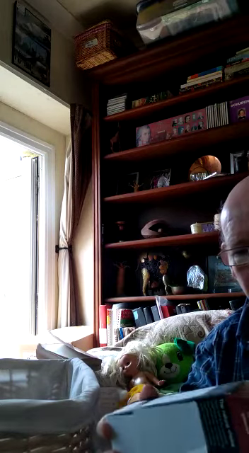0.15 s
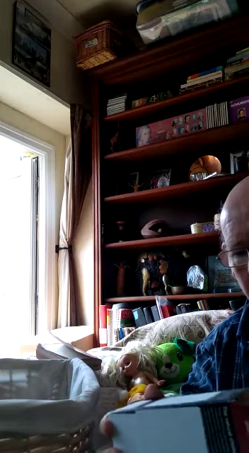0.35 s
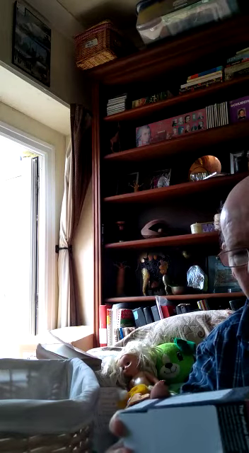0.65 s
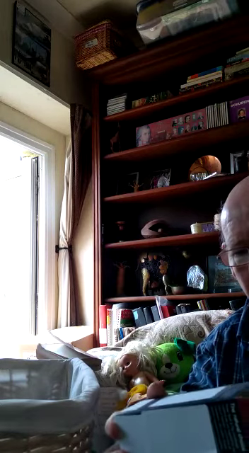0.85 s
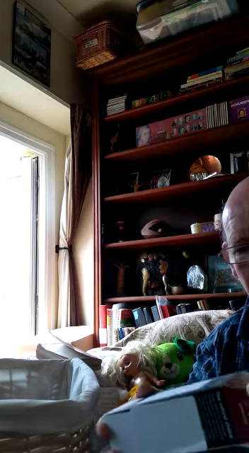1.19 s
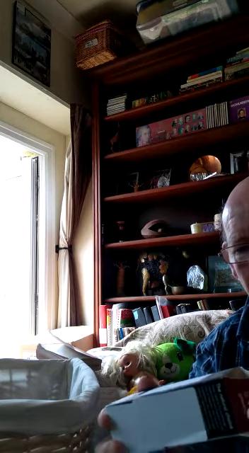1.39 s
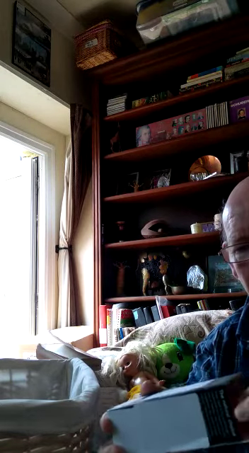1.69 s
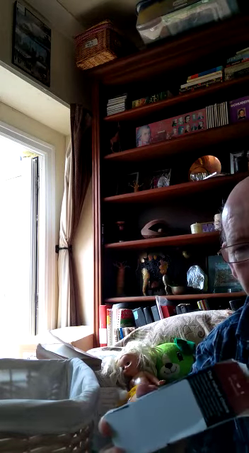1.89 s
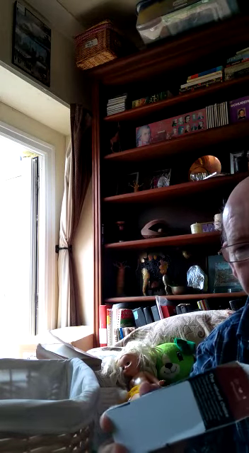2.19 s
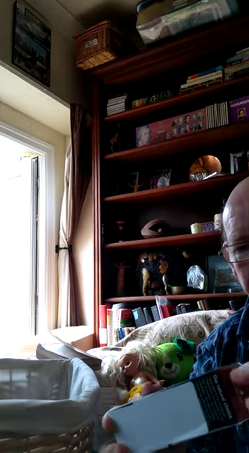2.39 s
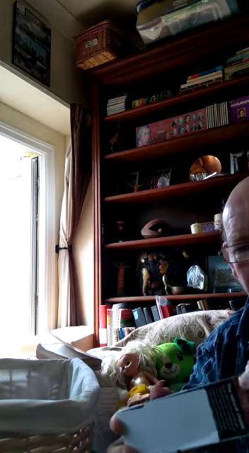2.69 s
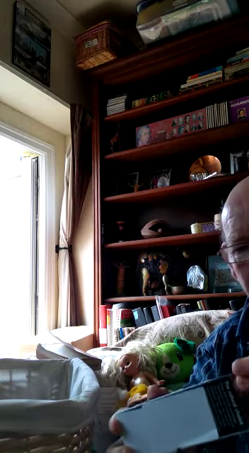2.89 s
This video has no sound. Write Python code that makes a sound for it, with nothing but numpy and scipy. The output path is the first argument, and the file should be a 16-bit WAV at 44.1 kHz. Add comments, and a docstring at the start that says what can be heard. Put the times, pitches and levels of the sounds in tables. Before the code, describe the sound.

Fingers slide and tap on a light hollow cardboard box, with a sharp rattling cluster near the end

```python
"""A quiet, furnished room: hands turn a small cardboard box close to a two-port microphone.
Fingers slide over the card (swelling fibre noise) and tap its panels (damped tones, thuds, cracks).
Near the end a flap scrapes in a quick run of snaps (resonant noise bursts), judders (slips ringing
the box modes) with a brief squeak (wavering tone) and knocks against the box."""
import sys
import numpy as np
from scipy import signal
from scipy.fft import rfft, irfft
from scipy.io import wavfile
from scipy.ndimage import uniform_filter1d

SR = 44100
rng = np.random.default_rng(int(sys.argv[2]) if len(sys.argv) > 2 else 0)


def generate_wav(signal):
    """Clip the signal to [-1, 1] and save it as 16-bit WAV at the path in sys.argv[1]."""
    frames = np.transpose(np.atleast_2d(signal))
    scaled = np.clip(frames, -1, 1) * 32767
    pcm = np.round(scaled).astype(np.int16)
    wavfile.write(sys.argv[1], SR, pcm)


N = 134505
TIME, HZ = np.arange(N) / SR, np.fft.rfftfreq(N, 1 / SR)

# left-right likeness of card noise: (frequency [Hz], likeness [-1 to 1])
CARD_LIKENESS = [(500, 0.87), (1200, 1), (1550, 0.41), (2100, 1), (6300, 0.55), (9000, 0.076)]
# left-right likeness of diffuse room sound: (frequency [Hz], likeness [-1 to 1])
DIFFUSE_LIKENESS = [(30, -0.9), (150, -0.69), (500, 0.75), (1100, 0.99), (9000, 0.47)]


def amp(db):
    """Decibels to gain."""
    return 10 ** (np.asarray(db) / 20)


def unit(x):
    """Scales to rms 1."""
    return x / np.sqrt(np.mean(x ** 2) + 1e-20)


def read(points, hz):
    """Interpolates a table on a log-frequency axis."""
    f, value = np.transpose(points)
    return np.interp(np.log(hz + 1), np.log(f + 1), value)


def noise_pair():
    """Two unrelated white noises."""
    return rng.standard_normal((2, N))


def coloured(pair, colour, likeness):
    """Turns two noises into stereo noise of given colour and left-right likeness, rms 1."""
    a, b = rfft(pair)
    same = np.clip(read(likeness, HZ), -1, 1)
    right = same * a + np.sqrt(1 - same ** 2) * b
    spectrum = np.array([a, right]) * amp(read(colour, HZ))
    return unit(irfft(spectrum, N))


def shifting(x):
    """Lets narrow bands swell and fade at random, as fingers moving over the card shift its colour."""
    shift_rms_db = 3
    z = signal.stft(x)[2]
    patches = uniform_filter1d(rng.standard_normal(z.shape[1:]), size=3, axis=0)  # across bands
    patches = unit(uniform_filter1d(patches, size=16))  # across frames
    return unit(signal.istft(z * amp(shift_rms_db * patches))[1][:, :N])


def strike(start, rise, decay):
    """Envelope of one contact: soft rise, exponential decay, peak 1."""
    t = np.maximum(TIME - start, 0)
    shape = (1 - np.exp(-(t / rise) ** 2)) * np.exp(-np.minimum(t / decay, 50))
    return shape / (shape.max() + 1e-12)


def box_ring(x):
    """Rings the decaying modes of the box."""
    # box modes: (frequency [Hz], level [dB], t60 [s])
    modes = [(272, -7, 0.12), (463, -11, 0.097), (690, -15, 0.11), (720, -5, 0.081), (1580, -2.5, 0.054),
             (2240, -4, .06), (2680, -13, 0.08), (2885, -16, 0.09)]
    t = np.arange(SR // 5) / SR
    ring = sum(amp(db - 60 * t / t60) * np.sin(2 * np.pi * hz * t) for hz, db, t60 in modes)
    return signal.fftconvolve(x, ring[None], axes=1)[:, :N]


def room_air():
    """Steady quiet of the room: coloured diffuse noise."""
    # air spectrum: (frequency [Hz], relative density [dB])
    air_colour = [(20, -29), (65, 1), (400, -7.5), (800, -8), (2500, -18.5), (5000, -26), (15000, -35.5)]
    air_rms_db = -56.5
    return amp(air_rms_db) * coloured(noise_pair(), air_colour, DIFFUSE_LIKENESS)


def fibres(smooth_share):
    """Tiny catches of card fibres over a smooth hiss; smooth_share is a power share."""
    catches_per_s, spread_db, clump_rms_db = 1100, 1.5, 1.12
    heights = amp(spread_db * np.minimum(rng.exponential(1, N), 4))
    catches = (rng.random(N) < catches_per_s / SR) * heights
    catches = unit(catches * rng.choice([-1., 1.], (2, N)))
    # the fibres catch in clumps
    clumps = amp(clump_rms_db * unit(uniform_filter1d(rng.standard_normal(N), size=200)))
    return clumps * (np.sqrt(1 - smooth_share) * catches + np.sqrt(smooth_share) * noise_pair())


def rubs():
    """Each slide swells and fades; coarse fibres rasp, fine ones fizz, and the hollow box is shaken."""
    # slides on card: (peak time [s], rise [s], fall [s], body level [dB], rasp level [dB], fizz level [dB])
    slides = [(.019, 0.02, 0.029, -52.5, -54.5, -59.5), (.19, 0.12, .041, -54, -62, -66.5),
              (.284, 0.035, 0.031, -46, -54.5, -56.5), (0.572, 0.1, 0.066, -49.5, -56, -60),
              (.679, 0.038, 0.068, -52, -58.5, -59), (0.907, 0.057, 0.09, -49.5, -55, -57.5),
              (1.091, 0.012, 0.012, -50.5, -54.5, -64.5), (1.511, 0.058, 0.085, -56, -60.5, -65),
              (1.77, 0.023, 0.024, -47.5, -49.5, -57), (1.83, 0.14, 0.081, -59.5, -60, -68),
              (2.064, 0.0073, 0.032, -50.5, -50.5, -63.5), (2.22, 0.019, 0.027, -51, -52.5, -56),
              (2.439, 0.029, 0.024, -41.5, -43.5, -48.5), (2.517, .016, 0.027, -47, -47, -50),
              (2.554, 0.029, 0.026, -37.5, -45, -49), (2.645, 0.032, 0.07, -51, -60.5, -62),
              (2.811, .062, 0.062, -56, -59, -65), (2.904, 0.015, 0.028, -47.5, -52.5, -56),
              (2.967, 0.022, 0.032, -51.5, -55.5, -59)]
    # spectra of box body, coarse rasp, fine fizz: (frequency [Hz], relative density [dB])
    body_colour = [(60, -27), (170, -11.5), (290, -3.5), (550, -5), (850, 3.5), (1200, -3), (1600, -6),
                   (2400, -23), (5000, -60.5), (15000, -78)]
    rasp_colour = [(300, -56), (1200, -10), (2000, 1.5), (2900, 3), (3600, -1), (4300, -5), (5800, -16),
                   (15000, -52)]
    fizz_colour = [(1000, -52), (3500, -9), (4900, 1.5), (6000, -1.5), (7700, 1.5), (10000, -3),
                   (15000, -2)]
    body_smooth_share, fibre_smooth_share = .85, 0.43  # the hollow box blurs the catches
    power = np.zeros((3, N))
    for peak, rise, fall, *levels_db in slides:
        width = np.where(TIME < peak, rise, fall)
        power += amp(levels_db)[:, None] ** 2 * np.exp(-2 * ((TIME - peak) / width) ** 2)
    body, rasp, fizz = np.sqrt(power)
    out = body * coloured(fibres(body_smooth_share), body_colour, CARD_LIKENESS)
    out += rasp * shifting(coloured(fibres(fibre_smooth_share), rasp_colour, CARD_LIKENESS))
    out += fizz * shifting(coloured(fibres(fibre_smooth_share), fizz_colour, CARD_LIKENESS))
    return out


def taps():
    """Each contact flexes one panel into a damped tone, with a dull thud and a dry crack."""
    # contacts: (time [s], ring level [dB], panel pitch [Hz], ring decay [s], thud level [dB], crack level [dB])
    contacts = [(.105, -35.5, 980, 0.0019, -44.5, -57), (.158, -30, 896, 0.0052, -40, -52),
                (.1615, -32.5, 472, 0.0017, -46.5, -58), (0.169, -40.5, 600, 0.0026, -44.5, -67),
                (.179, -41.5, 910, 0.0047, -42, -61), (.409, -45, 414, 0.0026, -48.5, -46.5),
                (0.5967, -24.5, 750, 0.0012, -43.5, -66), (.628, -37, 464, 0.0021, -45, -56),
                (.663, -43.5, 870, 0.0029, -66, -44.5), (.674, -38.5, 875, 0.0047, -44, -51),
                (.866, -43, 994, 0.0039, -53, -49), (.924, -34.5, 943, 0.0022, -37.5, -57),
                (1.092, -47, 1147, .004, -62, -68), (1.1015, -35.5, 774, 0.0012, -46, -65),
                (1.1035, -32, 420, 0.0039, -57, -68), (1.241, -44, 431, 0.0026, -51, -58),
                (1.4238, -35.5, 1016, 0.0018, -40, -51), (1.478, -30, 962, 0.0022, -42.5, -40.5),
                (1.573, -40.5, 1062, 0.0026, -42, -45), (1.755, -26.5, 840, 0.002, -33, -37.5),
                (1.762, -44, 694, 0.0081, -46, -55), (1.8334, -34.5, 987, 0.0031, -42, -42.5),
                (1.935, -46, 1220, 0.0042, -57, -51), (2.059, -46.5, 1250, 0.0035, -49, -43.5),
                (2.276, -48, 800, .003, -48, -60), (2.357, -40.5, 883, 0.0024, -46, -48),
                (2.412, -27, 1220, 0.0049, -45, -31), (2.430, -30.5, 1206, 0.0027, -39, -36.5),
                (2.455, -33.5, 740, 0.0063, -43, -48), (2.467, -38, 804, 0.0032, -59, -41),
                (2.499, -37, 1410, 0.0028, -41, -46), (2.511, -36.5, 1300, 0.0032, -50, -52),
                (2.531, -28.5, 470.3, 0.011, -41, -36), (2.530, -34.5, 1034, .004, -48, -44),
                (2.5753, -28.5, 820, 0.0016, -49, -67), (2.619, -24, 797, 0.0017, -41.5, -41.5),
                (2.627, -28, 780, 0.002, -38, -53), (2.625, -41, 276, 0.0085, -47, -65),
                (2.633, -33, 838, 0.0051, -42, -64), (2.8085, -42, 850, 0.0049, -47, -49.5),
                (2.8905, -32.5, 1084, 0.0027, -50, -43), (2.900, -33.5, 1025, 0.0025, -52, -58),
                (3.0115, -43, 970, 0.0027, -53, -49)]
    # spectra of thud and crack: (frequency [Hz], relative density [dB])
    thud_colour = [(60, -56), (170, -5.5), (280, -3.5), (450, -2.5), (800, 0), (1300, -6.5), (1800, -9),
                   (3000, -27), (6000, -29.5), (15000, -62)]
    crack_colour = [(200, -57), (1000, 1), (1700, 1.5), (2600, 8.5), (3500, -10), (4600, -7.5), (5800, -15),
                    (7700, -9), (9200, -14.5), (15000, -19.5)]
    ring_rise_share = 0.5  # of the decay: a soft finger presses slowly and lingers
    thud_rise_s, thud_decay_s, crack_rise_s = 0.001, 0.0038, 0.00074
    strongest_crack_decay_s = 0.0021 * np.e
    crack_stretch_db = 24  # a crack this much stronger lasts e times longer
    box_ring_db = -66  # how much every tap rings the box modes
    ring, thud, crack = np.zeros((3, N))
    strongest_db = max(row[-1] for row in contacts)
    for start, ring_db, hz, decay, thud_db, crack_db in contacts:
        tone = np.sin(2 * np.pi * hz * (TIME - start))
        ring += amp(ring_db) * strike(start, ring_rise_share * decay, decay) * tone
        thud += amp(thud_db) * strike(start, thud_rise_s, thud_decay_s)
        crack_decay_s = strongest_crack_decay_s * np.exp((crack_db - strongest_db) / crack_stretch_db)
        crack += amp(crack_db) * strike(start, crack_rise_s, crack_decay_s)
    out = ring + thud * coloured(noise_pair(), thud_colour, CARD_LIKENESS)
    out += crack * shifting(shifting(coloured(noise_pair(), crack_colour, CARD_LIKENESS)))
    return out + amp(box_ring_db) * box_ring(out)


def snaps():
    """A card edge lets go: a short burst in one resonance, which differs from snap to snap."""
    # edge releases: (time [s], level [dB], resonance [Hz])
    releases = [(0.276, -47, 3070), (.286, -48, 3000), (.298, -44, 3100), (1.4243, -46, 3400),
                (1.754, -50, 7850), (1.762, -43, 3540), (1.833, -50.5, 7000), (2.059, -49.5, 4760),
                (2.062, -44.5, 2870), (2.4145, -30.5, 7730), (2.4176, -39, 11300), (2.431, -33.5, 6600),
                (2.4394, -38, 7900), (2.44, -32.5, 2700), (2.45, -31.5, 2710), (2.4545, -45.5, 10000),
                (2.5002, -52, 11500), (2.562, -34.5, 2840), (2.891, -46, 4500)]
    rise_s, decay_s, width_share = 0.00095, 0.0026, 0.11  # width as a share of the resonance
    out = np.zeros((2, N))
    noise = rfft(coloured(noise_pair(), [(0, 0)], CARD_LIKENESS))
    for start, db, hz in releases:
        shape = strike(start, rise_s, decay_s)
        resonance = 1 / (1 + ((HZ - hz) / (width_share * hz)) ** 2)
        burst = shape * irfft(noise * resonance, N)
        out += amp(db) * unit(burst) * np.sqrt(np.mean(shape ** 2))
    return out


def judder():
    """The flap sticks and slips in uneven jerks that ring the box modes."""
    start_s, length_s, slip_db = 2.531, 0.051, -40
    median_slips_per_s, jitter = 250, .3  # jitter: spread of the log gap
    gaps = np.exp(jitter * rng.standard_normal(size=40)) / median_slips_per_s
    times = np.cumsum(gaps) - gaps[0]
    times = start_s + times[times < length_s]
    slips = np.zeros((1, N))
    slips[0, np.round(times * SR).astype(int)] = amp(slip_db)
    return box_ring(slips)


def squeak():
    """For a moment the slipping locks onto one wavering, slightly sagging note with its octave."""
    start_s, length_s, edge_s, pitch_hz = 2.543, 0.034, 0.0082, 1301.5
    left_db, right_db, octave_db = -29, -28, -20  # octave relative to the note
    wobble_share, glide_share = 0.0122, -.012  # of pitch: rms wobble, change over the length
    t = TIME - start_s
    shape = np.clip(np.minimum(t, length_s - t) / edge_s, 0, 1)
    wobble = unit(uniform_filter1d(rng.standard_normal(N), size=90))
    glide = np.clip(t / length_s - .5, -.5, .5)
    hz = pitch_hz * (1 + wobble_share * wobble + glide_share * glide)
    phase = 2 * np.pi * np.cumsum(hz) / SR
    return amp([[left_db], [right_db]]) * shape * (np.sin(phase) + amp(octave_db) * np.sin(2 * phase))


def near(x):
    """Six early reflections off hands, body and shelves."""
    span_s = .012
    echo = np.zeros(SR // 20)
    delays_s = rng.uniform(.15, 1, 6) * span_s
    echo[(delays_s * SR).astype(int)] = rng.choice([-1., 1.], len(delays_s))
    return signal.fftconvolve(x, echo[None] / np.linalg.norm(echo), axes=1)[:, :N]


def room(x):
    """A short diffuse tail, each band dying at its own speed."""
    # room decay: (frequency [Hz], t60 [s])
    decay_t60 = [(100, 0.35), (500, 0.2), (2500, 0.41), (8000, 0.37), (15000, 0.22)]
    onset_s = 0.0064  # the tail builds up over this time
    noise = coloured(noise_pair(), [(20, 0), (20000, 0)], DIFFUSE_LIKENESS)[:, :SR // 2]
    hz, t, z = signal.stft(noise, SR, nperseg=256)
    decay = amp(-60 * t / read(decay_t60, hz)[:, None])
    tail = signal.istft(z * decay, SR, nperseg=256)[1]
    tail = tail * np.minimum(np.arange(tail.shape[1]) / SR / onset_s, 1) ** 2
    return signal.fftconvolve(x, tail / np.linalg.norm(tail[0]), axes=1)[:, :N]


def scene():
    """The box in the hands, balanced per band between the ports, its reflections and the room's quiet."""
    # port balance: (frequency [Hz], left minus right [dB])
    port_balance = [(100, -3), (260, -1), (420, 3), (850, 2), (1150, 0), (1480, -6.5), (1900, -1),
                    (3500, 3), (6500, 1.5), (8000, 1), (10000, 7), (15000, 4.5)]
    bass_limit_hz = 203  # a small box radiates little below this
    near_db, room_db = -12.5, -10
    highpass = signal.butter(2, bass_limit_hz, "high", fs=SR, output="sos")
    box = signal.sosfilt(highpass, rubs() + taps() + snaps() + judder() + squeak())
    box = box + amp(near_db) * near(box) + amp(room_db) * room(box)
    balance_db = read(port_balance, HZ)
    placed = irfft(rfft(box) * amp([balance_db / 2, -balance_db / 2]), N)
    return placed + room_air()


def record(dry):
    """The two ports differ in phase; then the band limit."""
    # port phase: (frequency [Hz], left lead [rad])
    port_phase = [(0, 0), (1350, .2), (1650, 2.6), (2000, 3.1), (2250, 3.25), (2600, 4), (3200, 6.1),
                  (4300, 9.3), (6300, 15.7), (7200, 18.5), (8000, 19.3), (8700, 22), (15000, 40)]
    cutoff_hz = 14450
    phase = np.interp(HZ, *np.transpose(port_phase))
    right = irfft(rfft(dry[1]) * np.exp(-1j * phase), N)
    lowpass = signal.firwin(301, cutoff_hz, window=("kaiser", 8), fs=SR)
    return signal.oaconvolve(np.array([dry[0], right]), lowpass[None], "same")


dry = scene()
out = record(dry)
generate_wav(out)
```